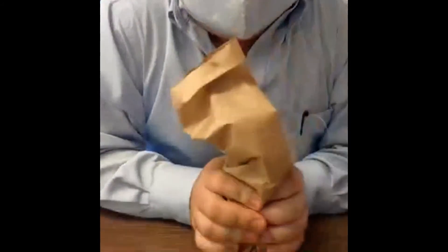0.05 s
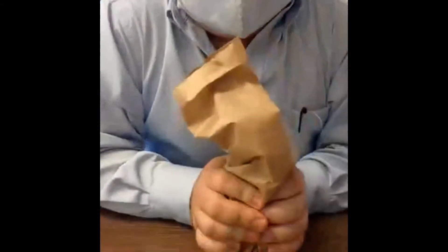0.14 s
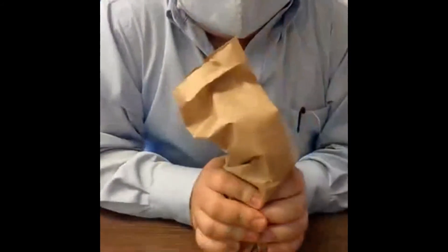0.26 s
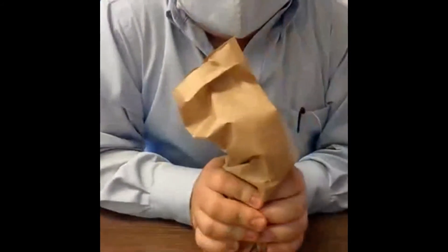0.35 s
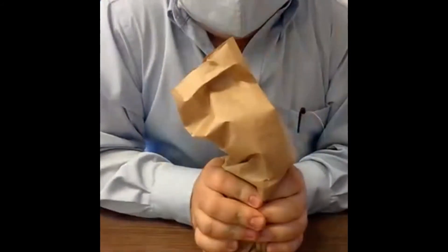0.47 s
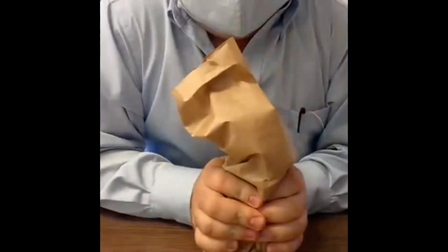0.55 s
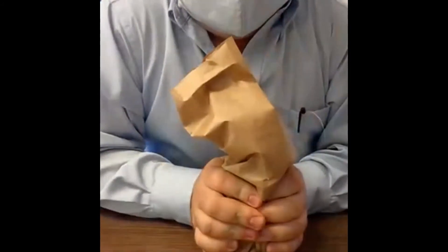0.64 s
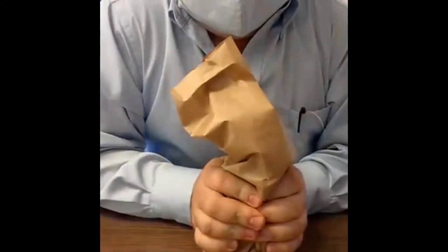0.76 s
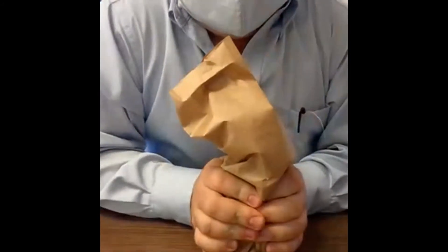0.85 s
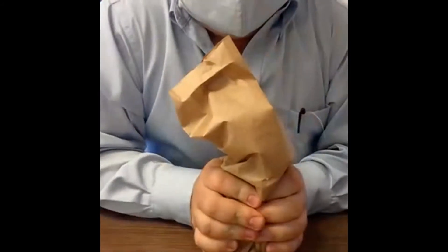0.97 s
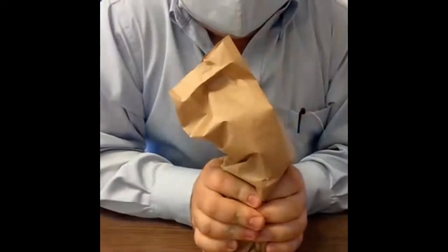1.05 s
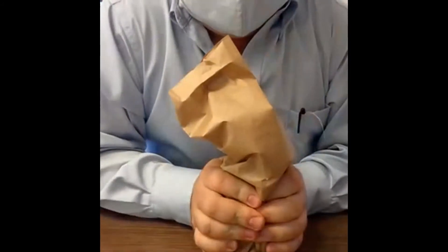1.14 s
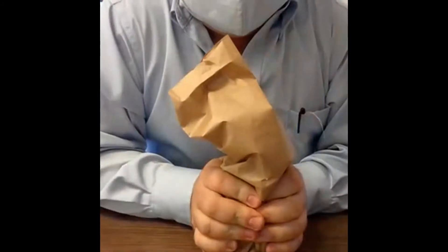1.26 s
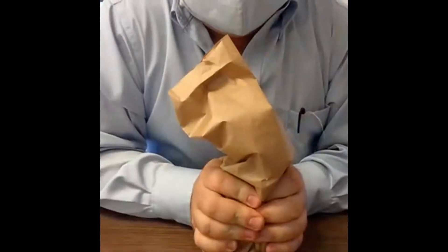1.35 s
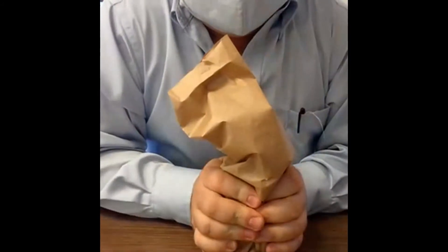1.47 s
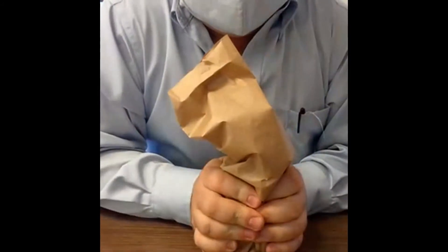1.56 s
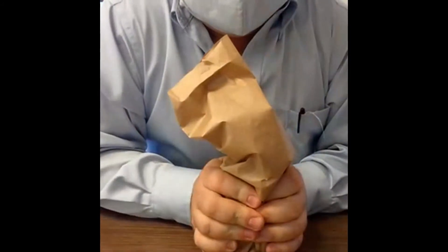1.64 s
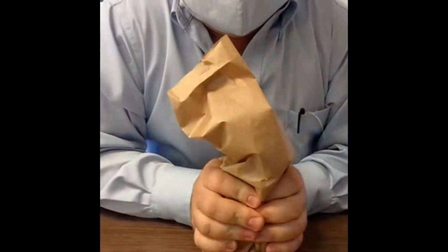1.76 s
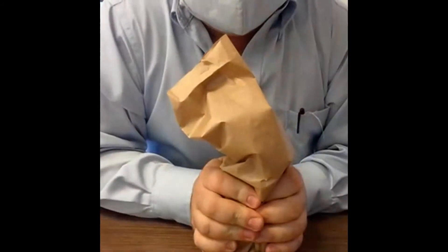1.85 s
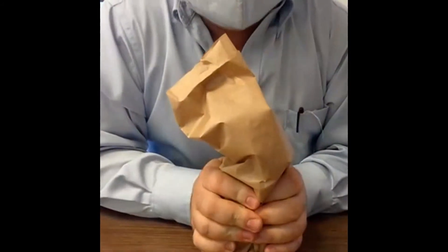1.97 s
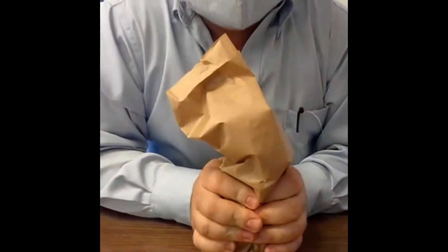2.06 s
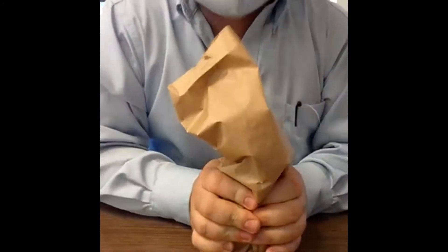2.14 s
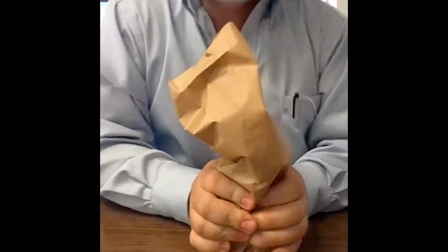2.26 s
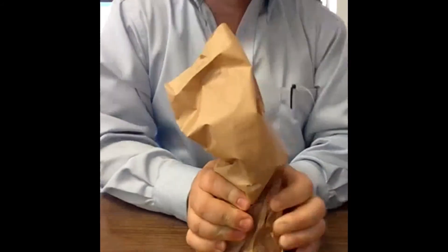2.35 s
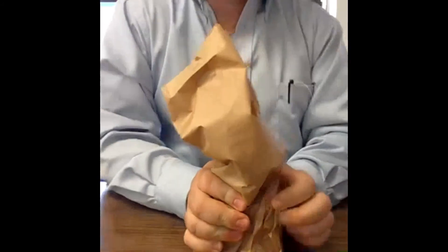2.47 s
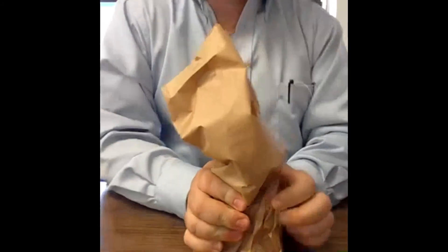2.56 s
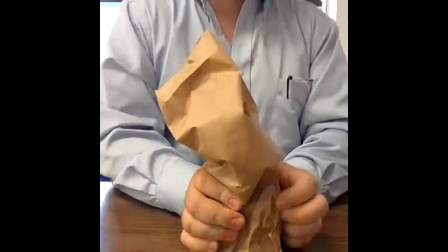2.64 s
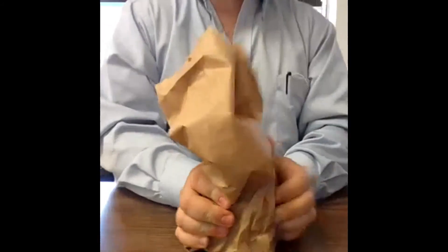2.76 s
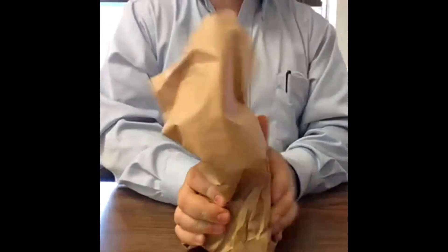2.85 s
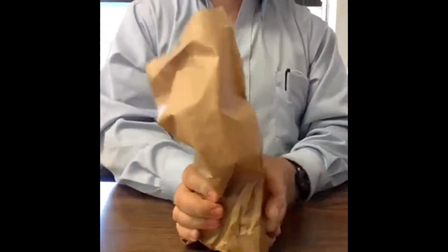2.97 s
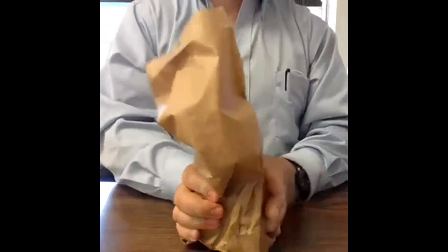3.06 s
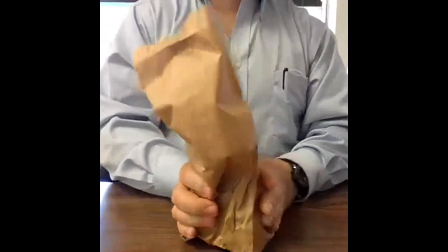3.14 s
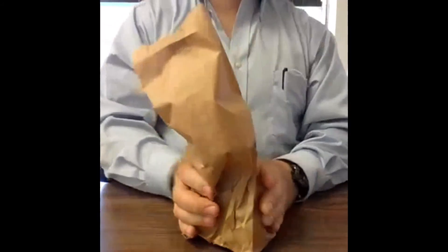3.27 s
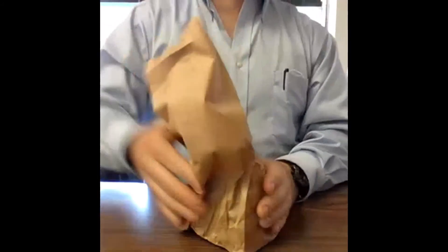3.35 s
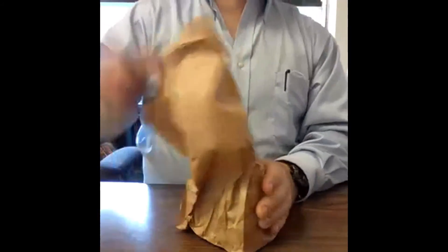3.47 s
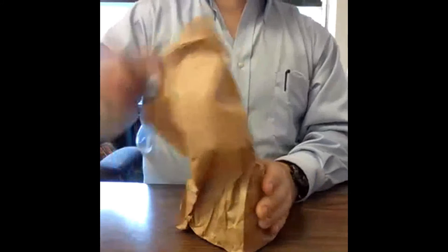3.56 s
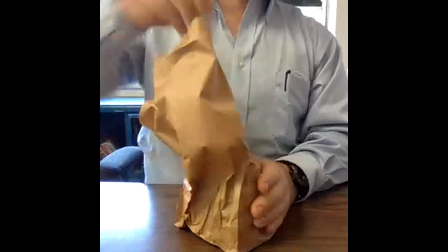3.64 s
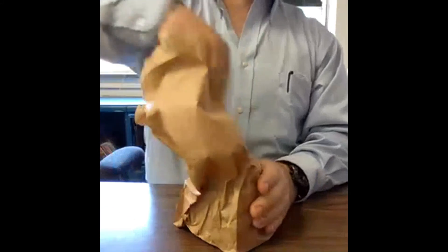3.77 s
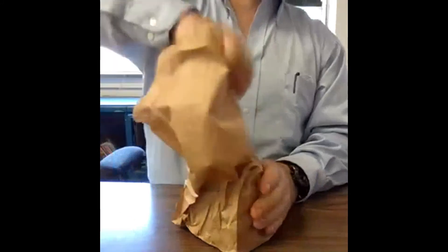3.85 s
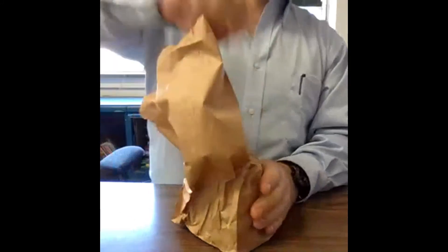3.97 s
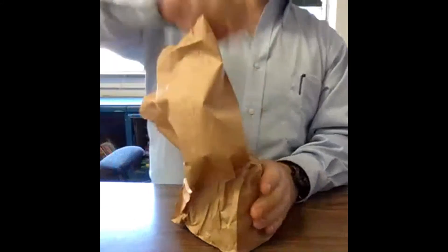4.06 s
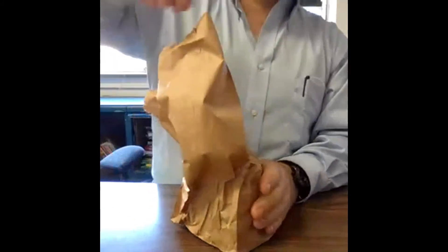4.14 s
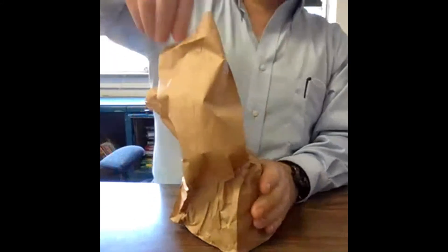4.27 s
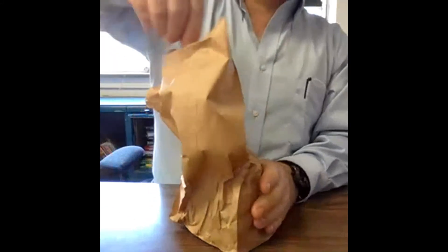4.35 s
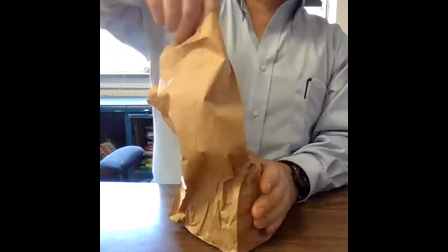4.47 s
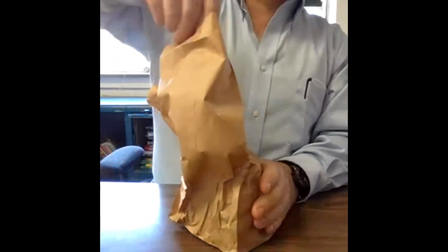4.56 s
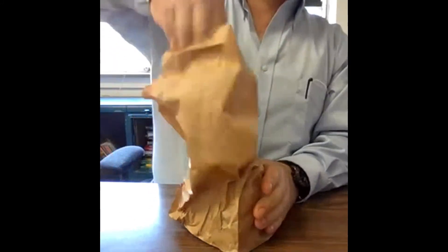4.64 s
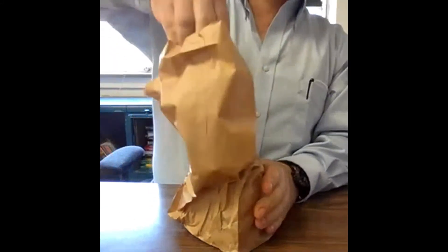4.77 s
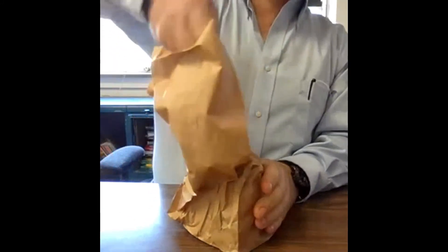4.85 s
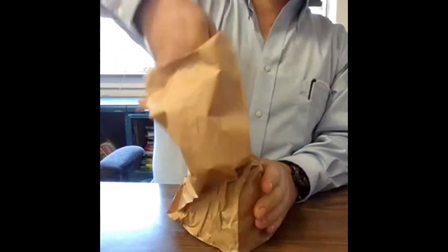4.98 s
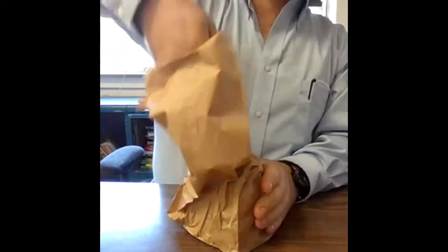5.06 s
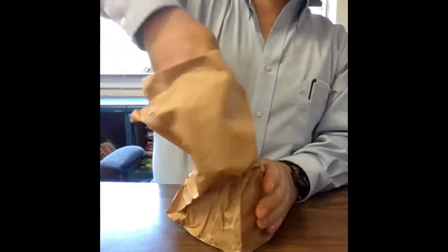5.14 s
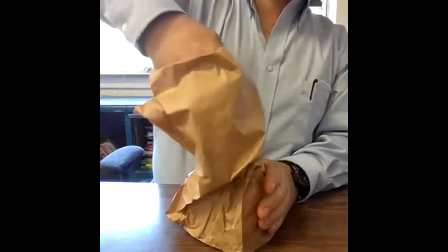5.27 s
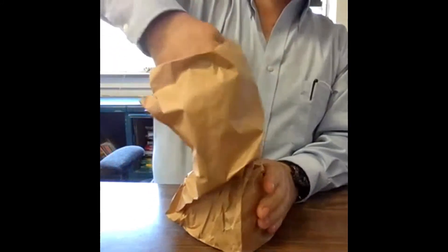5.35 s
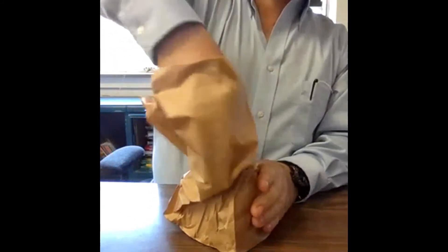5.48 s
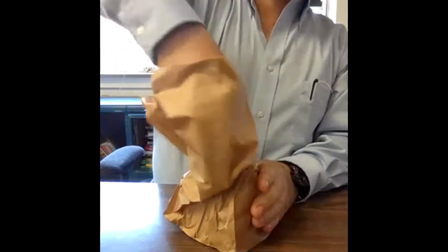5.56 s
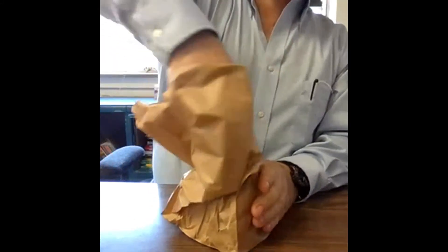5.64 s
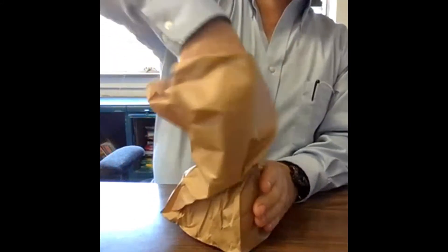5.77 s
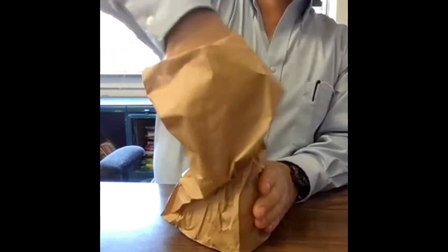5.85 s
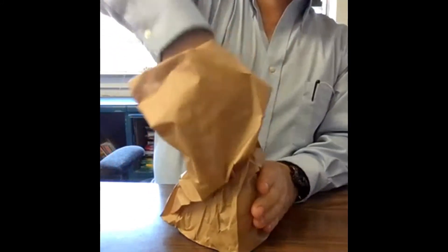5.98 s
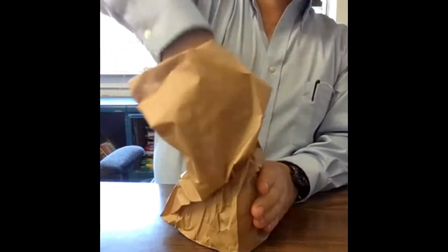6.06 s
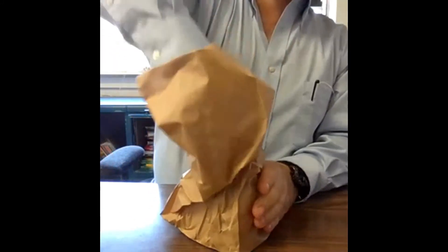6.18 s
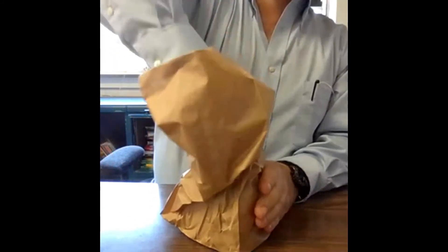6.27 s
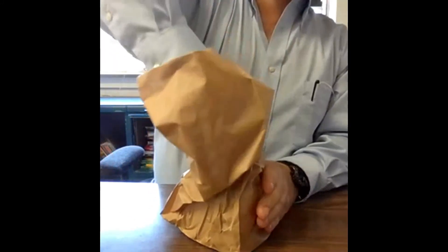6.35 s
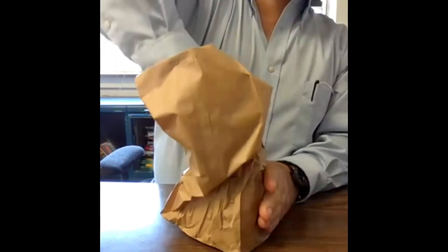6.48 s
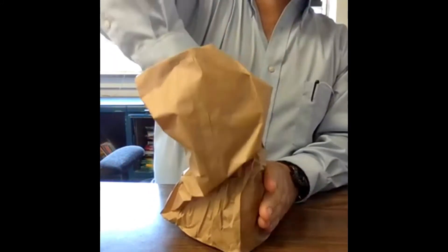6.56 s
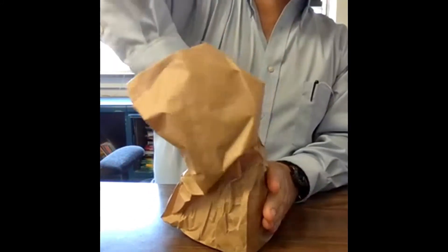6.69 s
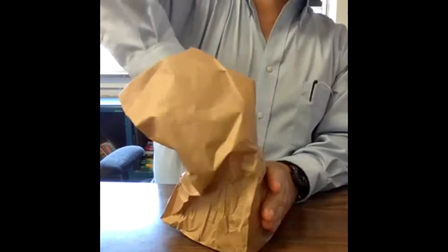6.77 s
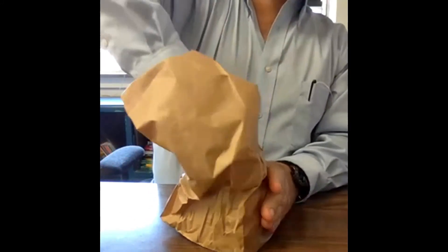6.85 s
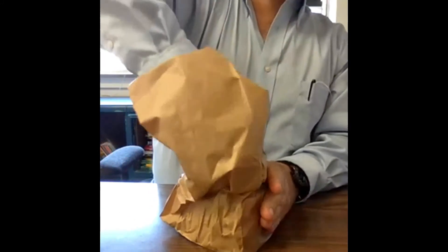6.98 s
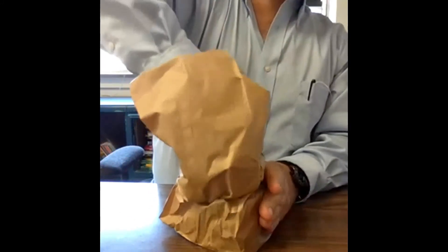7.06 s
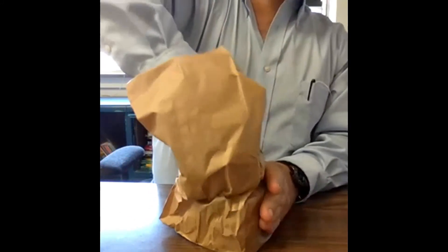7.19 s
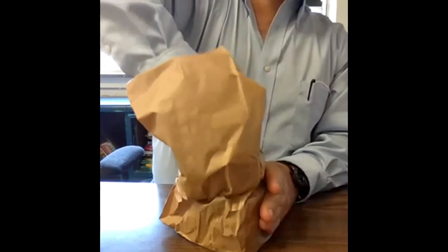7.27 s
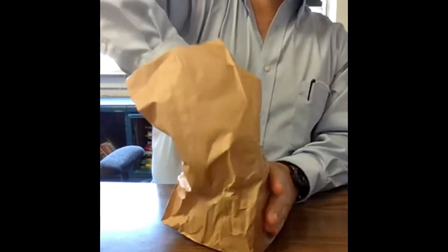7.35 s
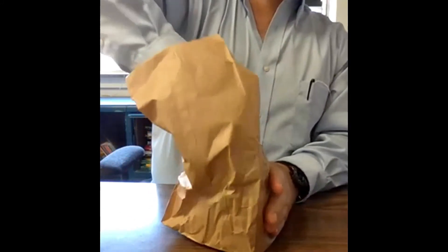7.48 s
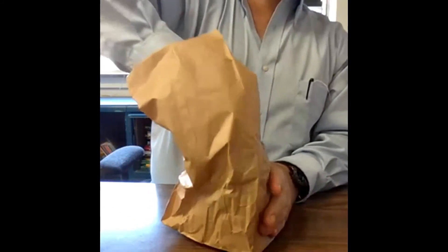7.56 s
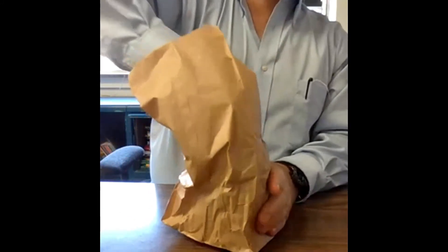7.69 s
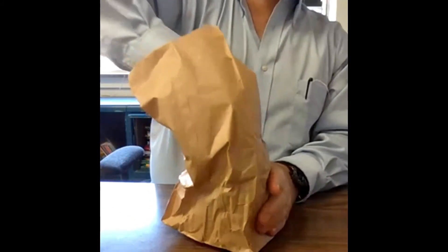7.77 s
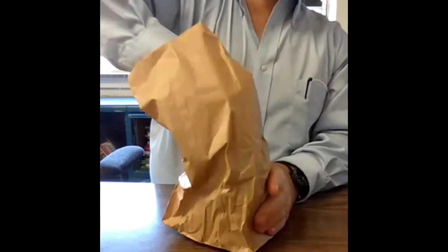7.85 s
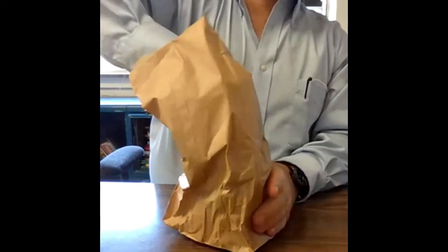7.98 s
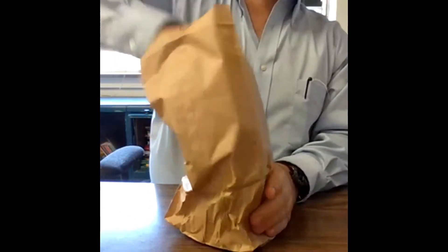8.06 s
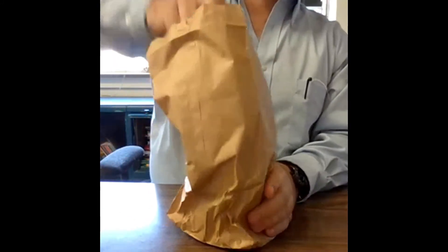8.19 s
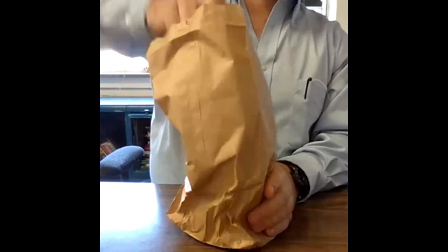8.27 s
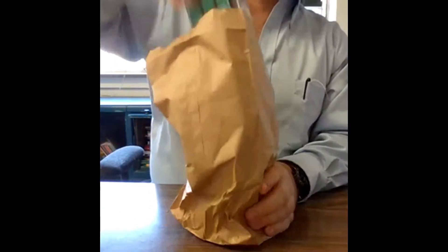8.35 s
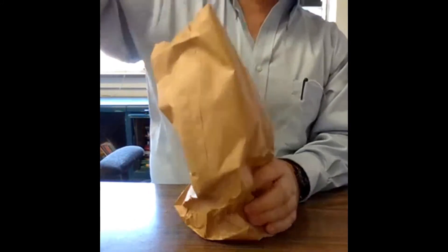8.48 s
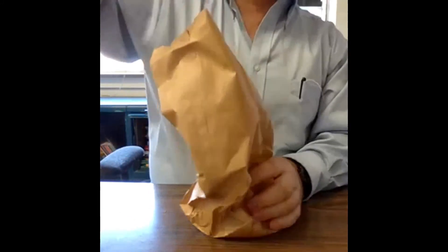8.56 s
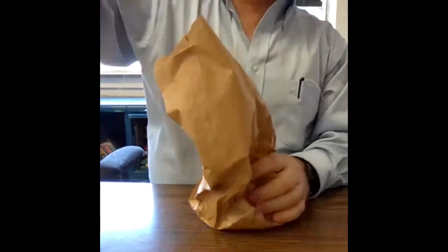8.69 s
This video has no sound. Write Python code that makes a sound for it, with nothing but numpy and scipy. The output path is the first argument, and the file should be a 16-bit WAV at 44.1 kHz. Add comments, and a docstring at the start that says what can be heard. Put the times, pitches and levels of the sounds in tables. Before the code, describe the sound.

Close crinkling and snapping of stiff paper, squeezed and pushed by hands, with dull table rumble beneath and two dead-silent gaps early on.

```python
"""In a small, quiet room with a low ventilation hum, hands squeeze a paper bag on a table, pause and go on.
Each movement stirs showers of tiny wrinkle sounds, the rub of skin, lesser creases and a dull table rumble.
Bigger creases snap as short jolts that ring the paper, and whole panels pop hollowly.
The sound drops out twice in the pause and dips briefly three times later."""
import sys
import numpy as np
from scipy import signal
from scipy.fft import rfft, irfft, next_fast_len
from scipy.io import wavfile
from scipy.ndimage import uniform_filter1d

SR = 44100
rng = np.random.default_rng(int(sys.argv[2]) if len(sys.argv) > 2 else 0)


def wrap_up_sound(samples):
    """Save the sound to the file named by the first command line argument, as 16-bit audio."""
    columns = np.atleast_2d(samples).T
    # keep every value between -1 and 1, then stretch to whole-number steps
    tamed = np.clip(columns, -1, 1)
    steps = np.round(tamed * 32767).astype(np.int16)
    wavfile.write(sys.argv[1], SR, steps)


N = 384552

# How far skin slides over the paper instead of creasing it.
# Each row: time in seconds, share of sliding from 0 to 1.
SLIDING = [(0, 0.5), (2.3, 0.1), (4.1, 0.7), (4.3, 0.9), (5.05, 0.7), (5.45, 0.4), (6.2, 0.4), (7.3, 0.4),
           (8.3, 0.6)]
TYPICAL_DB = -42  # crinkling level of a typical squeeze; stronger or weaker ones are compared with it


def amp(db):
    """Turn decibels into gain."""
    return 10 ** (np.asarray(db) / 20)


def unit(x):
    """Scale a sound to an average strength (rms) of 1."""
    return x / np.sqrt(np.mean(x ** 2) + 1e-20)


def along(points, hz):
    """Read a curve of (Hz, value) points on a logarithmic pitch axis."""
    f, v = np.transpose(points)
    return np.interp(np.log(hz + 1), np.log(f + 1), v)


def curves(rows):
    """Give one value per sample for each column after the time."""
    s, *cols = np.transpose(rows)
    return [np.interp(np.arange(N) / SR, s, c) for c in cols]


def filtered(x, response):
    """Filter a sound by a gain, real or complex, given for each frequency."""
    m = next_fast_len(N + SR // 2)
    return irfft(rfft(x, m) * response(np.fft.rfftfreq(m, 1 / SR)), m)[:N]


def coloured(x, spectrum, size=4096):
    """Filter with a (Hz, dB) shape that acts only forward in time, so that attacks stay sharp."""
    cepstrum = irfft(np.log(amp(along(spectrum, np.fft.rfftfreq(size, 1 / SR)))))
    # folding the cepstrum forward makes the filter respond as early as it can
    cepstrum[1:size // 2] *= 2
    cepstrum[size // 2:] = 0
    return signal.fftconvolve(x, irfft(np.exp(rfft(cepstrum))))[:len(x)]


def resonance(f, hz, width):
    """Response of one ringing mode, with gain 1 at its centre."""
    return 1j * f * width / (hz * hz - f * f + 1j * f * width)


def placed(times, rows):
    """Add up short sounds, one a row, each starting at its own time in seconds."""
    index = np.maximum(np.round(times * SR).astype(int), 0)[:, None] + np.arange(rows.shape[1])
    return np.bincount(index.ravel(), rows.ravel(), N)[:N]


def loud(spectra, db):
    """Short sounds, each with the energy of its level held for 3 ms."""
    rows = irfft(spectra)
    return rows / np.linalg.norm(rows, axis=1, keepdims=True) * np.sqrt(.003 * SR) * amp(db)[:, None]


def slips(count, size, follow, life, chatter, settle):
    """Spectra of folds giving way: fibres creak, the fold jumps a quarter into its row, after-slips die out."""
    t = (np.arange(size) - size // 4) / SR
    away = np.where(t < 0, -2 * t, t)  # the build-up is twice as quick as the settling
    chance = rng.standard_normal((count, 2, size))
    after_slips = follow * chance[:, 0] * np.abs(chance[:, 0]) * np.exp(-away / life)
    creaking = chatter * chance[:, 1] * np.exp(-away / settle)
    force = after_slips + creaking
    force[:, size // 4] = 1  # the jump itself
    return rfft(force), np.fft.rfftfreq(size, 1 / SR)


def grains(rate, hz, scatter, cycles, spread_db, size):
    """A steady shower of tiny rings of uneven size and pitch that swell and die within a few cycles, rms 1."""
    chance = rng.random((int(rate * N / SR), 4))
    pitch = hz * np.exp(scatter * (2 * chance[:, 1:2] - 1))
    phase = np.minimum(pitch, SR / 2) * np.arange(size) / SR  # in cycles
    # most rings are weak and a few are strong, up to a limit
    strength = amp(spread_db * np.minimum(-np.log(1 - chance[:, 2:3]), np.pi))
    swell = phase * np.exp(-phase / cycles)
    rings = strength * pitch / hz * np.sin(2 * np.pi * (phase + chance[:, 3:])) * swell
    return unit(placed(chance[:, 0] * N / SR, rings))


def ventilation():
    """A soft low rush of air, made of shaped noise, with a few duct resonances."""
    # Colour of the rush. Each row: frequency in Hz, relative strength in dB.
    rush_colour = [(25, -32.5), (50, -22.5), (80, -10.5), (115, -8.5), (200, -8.5), (300, -11.5),
                   (400, -10.5), (520, -16.5), (800, -22), (1500, -26.5), (3500, -38), (7000, -47.5),
                   (10000, -58.5), (16000, -48)]
    # Resonances of the duct. Each row: pitch in Hz, width in Hz of each of two passes, level in dB.
    duct_modes = [(109.8, 10, -72), (220, 41, -70.5), (364.8, 26, -68)]
    hum = amp(-66) * unit(coloured(rng.standard_normal(N), rush_colour))
    air = rng.standard_normal(N)
    for hz, width, db in duct_modes:
        hum = hum + amp(db) * unit(filtered(air, lambda f: resonance(f, hz, width) ** 2))
    return hum


def room(x, wet_db):
    """Add the short tail of a furnished room: noise that fades at its own speed in each pitch range."""
    # How the room dies away. Each row: frequency in Hz, time in seconds to fall by 60 dB.
    fading = [(200, 0.13), (2000, 0.052), (6000, 0.084), (14000, 0.043)]
    hz, t, z = signal.stft(rng.standard_normal(SR // 3), SR, nperseg=256)
    tail = signal.istft(z * amp(-60 * t / along(fading, hz)[:, None]), SR, nperseg=256)[1]
    tail = np.pad(tail / np.linalg.norm(tail), (SR // 250, 0))  # it starts 4 ms after the direct sound
    return x + amp(wet_db) * signal.fftconvolve(x, tail)[:N]


def gesture(start, hold, db):
    """Level in dB of one movement: it takes hold, stays, lets go, and the paper settles slowly."""
    attack_db_per_s, release_db_per_s, settle_db_per_s = 419, 258, 78.5
    t = np.arange(N) / SR - start
    before, after = np.maximum(-t, 0), np.maximum(t - hold, 0)
    # the paper goes on unfolding; harder movements leave more to unfold
    unfolding_db = np.minimum(-8.5 + 0.27 * (db - TYPICAL_DB), 0)
    settling = unfolding_db - settle_db_per_s * after
    return db - attack_db_per_s * before + np.maximum(-release_db_per_s * after, settling)


def table_rumble(crinkle_db):
    """Hands and bag shift on the wooden table: dull, lumpy noise that grows with the effort."""
    # Shifts on the table. Each row: start in seconds, hold in seconds, level in dB before the table's gain.
    shifts = [(0.123, 0.83, -65), (3.02, 0.46, -59.5), (5.297, .1, -60), (5.446, 0.11, -54.5),
              (4.106, 0.14, -60), (5.896, 0.054, -57.5), (6.16, 0.043, -50.5), (7.03, 0.11, -59),
              (8.462, .06, -57)]
    # Colour of the rumble. Each row: frequency in Hz, gain in dB.
    rumble_colour = [(25, -33.5), (50, -12.5), (85, -1), (130, 4), (200, 0), (350, -7), (900, -43),
                     (4000, -73.5)]
    table_gain_db, lumpy_db = 18.5, 3  # the table top amplifies the handling, in uneven lumps
    pressing_db = -66 + 0.28 * (crinkle_db - TYPICAL_DB)
    level_db = np.max([pressing_db] + [gesture(start, hold, db) for start, hold, db in shifts], axis=0)
    lumps = unit(filtered(rng.standard_normal(N), lambda f: np.exp(-(f / 20) ** 2)))
    rumble = amp(level_db + table_gain_db + lumpy_db * lumps) * rng.standard_normal(N)
    return coloured(rumble, rumble_colour)


def effort():
    """Effort levels of crinkling and panel flexing in dB; the strongest movement of the moment leads."""
    # Squeezes and pushes of the hands. Each row: start in seconds, hold in seconds,
    # crinkling effort in dB, panel flexing in dB relative to the crinkling effort.
    squeezes = [(0.0, .03, -30, -9), (0.08, 0.04, -32, -8.5), (0.16, 0.035, -39.5, -9),
                (2.345, 0.046, -50.5, -15), (2.5, 0.045, -51.5, -22), (2.595, 0.014, -41, -15),
                (2.73, 0.13, -53, -10), (2.85, 0.028, -49.5, -20), (2.98, 0.067, -46.5, -19),
                (3.055, 0.038, -37, -13.5), (3.16, 0.069, -42, -3), (3.32, 0.072, -42, -7.5),
                (3.39, 0.16, -43.5, -6), (3.585, 0.051, -43.5, -7), (3.7, 0.034, -41, -9),
                (3.768, 0.021, -34, -9.5), (4.035, 0.035, -39.5, -18), (4.115, 0.11, -40, -6),
                (4.64, 0.012, -64, -5), (4.73, 0.02, -56.5, -15), (4.86, .1, -48.5, -30),
                (4.975, 0.028, -43.5, -25), (5.125, 0.009, -45.5, -8), (5.23, .12, -41.5, -13.5),
                (5.385, 0.18, -38.5, -7), (5.6, 0.03, -40, -1), (5.785, 0.068, -37.5, -5.5),
                (5.9, 0.13, -34, -8.5), (6.05, 0.12, -36, -6.5), (6.135, 0.051, -32, -5),
                (6.35, 0.062, -42.5, -12.5), (6.445, 0.052, -42, -27), (6.52, 0.013, -38, -7.5),
                (6.61, 0.045, -47.5, -11), (6.825, 0.064, -51.5, -4.5), (7.0, 0.011, -42.5, -7),
                (7.07, 0.05, -44.5, -16), (7.19, 0.087, -43, -13), (7.33, 0.071, -47, -7.5),
                (7.455, 0.017, -40, -10), (7.72, 0.13, -46, -17), (8.005, 0.036, -39, -12.5),
                (8.09, 0.026, -45, -13), (8.31, 0.08, -45, -7), (8.4, 0.15, -36, -10.5),
                (8.595, 0.018, -37, -20)]
    # Fingers rest on the paper and keep it stirring. Each row: start in seconds, hold in seconds,
    # crinkling effort in dB, panel flexing in dB relative to the crinkling effort.
    touches = [(2.36, 0.58, -60, -5), (3.0, 1.25, -59, -7), (4.84, 3.88, -55, -6), (5.3, 0.95, -49, -3)]
    crinkle_db = flex_db = np.full(N, -120.0)
    for start, hold, db, flex in list(squeezes) + list(touches):
        level = gesture(start, hold, db)
        crinkle_db, flex_db = np.maximum(crinkle_db, level), np.maximum(flex_db, level + flex)
    return crinkle_db, flex_db


def crinkle(crinkle_db, flex_db):
    """Countless small wrinkles give way in clusters as the paper bends and rubs against the skin."""
    # Colour of the wrinkles. Each row: frequency in Hz, gain in dB.
    wrinkle_colour = [(300, -22), (700, -6.5), (1200, -8.5), (1900, 6), (3600, -0.5), (5500, -3.5),
                      (7000, -3.5), (10000, -21.5), (13000, -9.5), (16000, -16.5)]
    # Colour of skin rubbing on paper. Each row: frequency in Hz, gain in dB.
    rub_colour = [(300, -32.5), (700, -8), (1200, -1.5), (1600, -1.5), (1950, 3.5), (2500, -1.5), (3450, 2),
                  (4400, -1), (6000, -8.5), (7200, -11), (10000, -22), (13000, -17.5), (16000, -23)]
    # Colour of the flexing panels. Each row: frequency in Hz, gain in dB.
    flex_colour = [(60, -29.5), (150, -11), (280, -3.5), (380, 1.5), (600, 0.5), (900, -3), (1400, -3),
                   (2500, -29), (6000, -57.5)]
    wrinkles_trim_db, flex_trim_db = -0.5, -2  # added to the effort levels
    sliding = np.clip(curves(SLIDING)[0], 0, 1)

    # wrinkles set each other off in brief surges; freely sliding skin rubs more steadily
    surge = np.tanh(unit(filtered(rng.standard_normal(N), lambda f: np.exp(-(f / 110) ** 2))))
    shower = grains(rate=1000, hz=4000, scatter=1.1, cycles=.75, spread_db=5, size=256)
    wrinkles = unit(coloured(amp(5.5 * surge) * shower, wrinkle_colour))
    friction = amp(8.5 * (1 - sliding) * surge) * rng.standard_normal(N)
    rub = unit(coloured(friction, rub_colour))
    paper = np.sqrt(1 - sliding) * wrinkles + np.sqrt(sliding) * rub

    # tight wrinkles sound brighter than loose ones, so the treble grows faster with effort
    tight = filtered(paper, lambda f: f ** 4 / (f ** 4 + 4500 ** 4))
    treble_db = crinkle_db + 0.5 + 0.0533 * (crinkle_db - TYPICAL_DB)
    fine = amp(crinkle_db) * (paper - tight) + amp(treble_db) * tight

    # panels bend with lower rings and some noise
    flex = grains(rate=600, hz=704.6, scatter=0.95, cycles=1.0, spread_db=2.5, size=1024)
    flex = flex + amp(-1.5) * rng.standard_normal(N)
    flex = unit(amp(5.8 * surge) * coloured(flex, flex_colour))
    return amp(wrinkles_trim_db) * fine + amp(flex_db + flex_trim_db) * flex


def panels(size=4096):
    """A broad panel flips over and pops into the hollow of the bag, swelling for a cycle or two."""
    # Panels buckling. Each row: time in seconds, level in dB before a cut of 6 dB, pitch in Hz.
    pops = [(0.109, -31, 446), (0.549, -44, 402), (0.896, -41.5, 250), (0.9, -53, 1450), (2.492, -46, 417),
            (2.502, -33, 458), (2.531, -43, 439), (2.592, -32, 1240), (2.619, -31, 425), (3.06, -38, 1020),
            (3.46, -35.5, 360), (3.769, -26, 980), (4.139, -36.5, 894), (5.004, -35.5, 510),
            (5.462, -25, 585), (5.478, -24.5, 486), (5.499, -26, 467), (5.542, -33, 345),
            (5.754, -35, 1200), (5.901, -25, 350), (5.995, -28.5, 460), (6.085, -30.5, 426),
            (6.211, -30, 1020), (6.718, -31, 690), (7.231, -30, 1400), (7.862, -29.5, 1070),
            (8.413, -30.5, 1320), (8.447, -28.5, 386), (8.536, -34.5, 350)]
    s, db, hz = np.transpose(pops)
    force, f = slips(len(s), size=size, follow=0.032, life=0.0029, chatter=0.027, settle=0.014)
    hollow = resonance(f, hz[:, None], 0.53 * hz[:, None]) ** 2
    return placed(s - size // 4 / SR + .0005, loud(force * hollow, db - 6.0))


def small_snaps(crinkle_db):
    """Lesser creases give way at random, louder as the hands press harder; rows as creases() reads them."""
    per_second, spread_db = 48, 4
    count = int(per_second * N / SR)
    at = ((np.arange(count) + rng.random(count)) * N / count).astype(int)
    strength, facet, sheet = np.clip(rng.standard_normal((count, 3)), -2, 2).T
    # fully sliding skin sets off creases 5 dB weaker
    db = crinkle_db[at] + 3.5 - 5 * curves(SLIDING)[0][at] + spread_db * strength
    hz = 3500 * np.exp(0.21 * facet)
    sheet_db, crack_db = -10.5 + spread_db * sheet, np.full(count, -10.5)
    return np.column_stack([at / SR, db, hz, sheet_db, crack_db])


def creases(snaps, size=1024):
    """Each snapping crease rings a stiff facet of paper, shakes the sheet around it and gives a bright crack."""
    facet_trim_db, crack_trim_db = 1.5, -0.5
    s, db, hz, sheet_db, crack_db = np.transpose(snaps)
    # strong creases go in one jump, weak ones crumble more raggedly
    ragged = np.clip(amp(-.35 * (db[:, None] + 32)), .7, 1.5)
    force, f = slips(len(s), size=size, follow=.16, life=.001, chatter=.028 * ragged, settle=.007)
    # the bending wave returns from the next fold, which gives each snap its own colour
    distance, strength = rng.random((2, len(s), 1))
    delay = .0003 + .0008 * distance  # seconds
    force = force * (1 - 1.6 * strength * np.exp(-2j * np.pi * f * delay))

    pitch = hz[:, None]
    facet_ring = resonance(f, pitch, .6 * pitch) * resonance(f, pitch, 1.25 * pitch)
    facet = loud(force * facet_ring, db + facet_trim_db)
    # the sheet rings lower or higher as the folds around a crease lie
    sheet_hz = 1290 * np.exp(.2 * rng.uniform(-1, 1, (len(s), 1)))
    sheet = loud(force * resonance(f, sheet_hz, 350) * resonance(f, 650, 1200), db + sheet_db)
    crack_ring = resonance(f, 10200, 6400) * resonance(f, 12000, 8700)
    crack = loud(force * crack_ring, db + crack_db + crack_trim_db)
    return placed(s - size // 4 / SR - .0003, facet + sheet + crack)


def scene():
    """The bag in a quiet room; one effort drives the wrinkles, the lesser creases and the table."""
    # The creases that stand out. Each row: time in seconds, base level in dB, pitch of the paper facet in Hz,
    # sheet in dB and crack in dB relative to the base level; creases() trims facet and crack slightly.
    big_snaps = [(0.0171, -33, 2650, 1, -20), (0.0831, -35, 3840, -15, -19), (0.1285, -24.5, 4960, -7, -27),
                 (0.1553, -24.5, 4480, -15, -20), (0.2089, -32.0, 3620, -26, -20),
                 (0.2188, -27, 3500, -10.5, -14), (0.2693, -39, 3500, -7.5, -16),
                 (0.2868, -41.5, 3580, -3, -12), (0.4432, -36, 3700, -35, -12),
                 (0.5512, -47.5, 3060, -1.5, -15), (0.5618, -46, 3340, -25, -16),
                 (0.6205, -48.0, 2860, -12, -25), (0.9013, -58, 1972, -11.5, -12.5),
                 (1.4748, -49, 2655, -25.5, -21.5), (2.3221, -42.5, 2500, -19.5, -23.5),
                 (2.37, -34.5, 3540, -17, -16), (2.4595, -41.0, 3660, -30, -18),
                 (2.4944, -36.5, 3530, -17, -19), (2.5317, -46, 2680, -18, -21),
                 (2.6223, -32.5, 2840, -0.5, -8.5), (2.6502, -46, 1900, 6, -25),
                 (2.6924, -28, 3370, -10, -23), (2.7316, -40, 2450, -2, -25),
                 (2.7735, -34.5, 2360, -31, -25), (2.7963, -35, 3370, -32, -23),
                 (2.8356, -47, 4090, -24, -15), (2.858, -35, 3800, -30, -20),
                 (2.8883, -38.5, 2800, -24, -24), (2.9802, -33.5, 4450, -23, -18),
                 (3.0015, -33, 3020, -23, -25), (3.0152, -45, 3350, -17, -17),
                 (3.0405, -32.5, 3350, -17, -33), (3.0938, -31.5, 2610, -11.5, -23),
                 (3.1412, -33, 4810, -21, -12), (3.167, -31.0, 3000, -5, -19), (3.2004, -36, 4430, -4, -14),
                 (3.2197, -28, 3070, -4.5, -25), (3.2962, -37, 4500, -29, -18),
                 (3.3395, -33, 3670, -5, -27), (3.4065, -29.5, 2300, -3.5, -33),
                 (3.4564, -25.5, 3460, -11, -31), (3.5269, -37, 3940, -7, -21),
                 (3.5944, -28, 3540, -9.5, -22), (3.6733, -36, 3000, -5, -20),
                 (3.7174, -37, 2610, 0.5, -24), (3.7834, -24, 2900, -12, -20),
                 (4.0316, -33.5, 4400, -11, -26), (4.0646, -31.0, 3940, -6, -30),
                 (4.1142, -29, 4600, -5.5, -16), (4.1326, -26, 3450, -31, -18),
                 (4.4181, -42.0, 3700, -13, -18), (4.6209, -45.0, 4440, -9, -13),
                 (4.6472, -42, 3030, -15, -21), (4.7284, -48, 4240, -20, -14),
                 (4.8616, -37, 2870, -28, -29), (4.9916, -29, 3280, -23, -20),
                 (5.13, -35.5, 2580, -27, -19), (5.2348, -37, 3450, -17, -13),
                 (5.3749, -28.5, 3100, -15, -14), (5.3895, -23.5, 3570, -13, -17),
                 (5.4187, -27, 3640, -1, -16), (5.4678, -23.5, 3600, -8, -19),
                 (5.5429, -24.5, 3000, -10, -34), (5.7954, -31.5, 3640, -29, -10),
                 (5.8162, -29, 2780, -11, -29), (5.9049, -29, 3440, -8, -22),
                 (5.9502, -21.5, 4100, -17, -8.5), (6.032, -26.5, 2740, -25, -24),
                 (6.1228, -27.5, 4200, -11, -23), (6.1435, -23, 3770, -6.5, -30),
                 (6.195, -22.5, 3220, -14, -32), (6.3944, -26.5, 3540, -18, -32),
                 (6.4061, -33, 2300, -15, -22), (6.4434, -33.5, 4350, -22, -12),
                 (6.4734, -39, 2720, -25, -7), (6.5266, -30, 4270, -6, -8), (6.5412, -29.0, 3600, -9, -14),
                 (6.5661, -29, 3590, -21, -15), (6.6157, -33, 3950, -15, -16),
                 (6.6451, -28.5, 4760, -13.5, -6), (6.7216, -23, 3050, -15.5, -18),
                 (6.8233, -35, 2670, -2.5, -23), (6.8469, -33.0, 2750, -13, -31),
                 (6.8679, -37.5, 2800, -21, -16), (7.0057, -24.5, 3770, -24, -16),
                 (7.0595, -31, 3580, -11, -15), (7.1254, -30.5, 3270, -28, -20),
                 (7.1863, -40, 3040, -18, -18), (7.2085, -29.5, 4400, -13, -20),
                 (7.245, -27.5, 3730, -14, -13), (7.2795, -30, 4500, -5, -12),
                 (7.2993, -36, 3200, -30, -19), (7.3467, -31.0, 3560, -29, -16),
                 (7.3884, -36.5, 3610, -17, -18), (7.4157, -29, 4280, -39, -6),
                 (7.4596, -26.0, 3770, -36, -10.5), (7.531, -30.5, 2500, -35, -26),
                 (7.5641, -27.5, 4700, -17.5, -8), (7.6312, -28.5, 3140, -32, -23),
                 (7.6822, -39, 3120, -6, -19), (7.722, -26, 3860, -15, -26), (7.7288, -33, 3940, -18, -14),
                 (7.7976, -32, 3530, -19, -12), (7.8339, -35, 3370, -35, -14),
                 (7.9935, -31.5, 2870, -25, -17), (8.0054, -25, 3300, -22, -28),
                 (8.0496, -28.5, 3020, -9, -18), (8.1052, -29.5, 2240, -2.5, -28),
                 (8.1705, -27.5, 4600, -20, -10.5), (8.1935, -33.5, 3200, -11, -17),
                 (8.2966, -28, 3360, -30, -21), (8.3059, -37, 3400, -26, -17),
                 (8.3542, -32, 3360, -22, -15), (8.4461, -23, 4030, -10.5, -13),
                 (8.4878, -20.5, 2930, -12, -15), (8.5256, -29, 3960, -4.5, -12),
                 (8.625, -28.5, 4250, -5.5, -12), (8.6586, -32, 4900, -11.5, -12)]
    crinkle_db, flex_db = effort()
    bag = crinkle(crinkle_db, flex_db) + panels()
    bag = bag + creases(small_snaps(crinkle_db)) + creases(big_snaps)
    return (ventilation() + table_rumble(crinkle_db) + room(bag, wet_db=-16.0))[None]


def record(dry):
    """The microphone has a notch in the treble; the sound drops out now and then and ends at a band limit."""
    # Colour of the microphone. Each row: frequency in Hz, gain in dB.
    microphone_colour = [(30, 0), (100, -0.5), (6200, -1), (7200, -5.5), (8050, -18.5), (9000, 2),
                         (10000, 6), (16000, -21)]
    # Dropouts and brief dips. Each row: start in seconds, end in seconds, level change in dB.
    dropouts = [(1.113, 1.445, -70), (1.992, 2.269, -70), (2.279, 2.296, -14), (3.904, 3.916, -20),
                (3.954, 3.966, -20)]
    top_hz = 16100  # nothing is heard above this
    t = np.arange(N) / SR
    dip_db = sum(db * ((t > start) & (t < end)) for start, end, db in dropouts).astype(float)
    dip_db = uniform_filter1d(dip_db, size=128)  # rounds the edges over about 3 ms
    heard = coloured(dry[0], microphone_colour) * amp(dip_db)
    return filtered(heard, lambda f: f < top_hz)[None]


dry = scene()
out = record(dry)
wrap_up_sound(out)
```